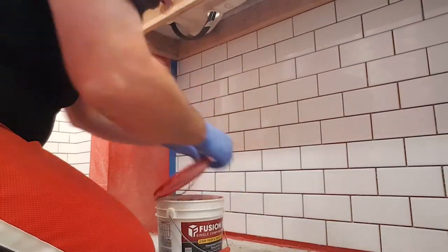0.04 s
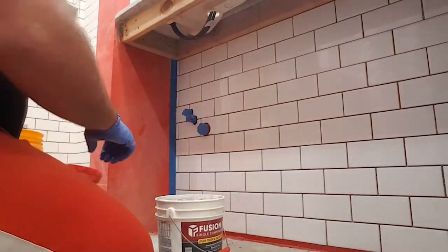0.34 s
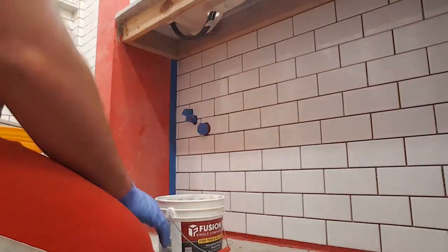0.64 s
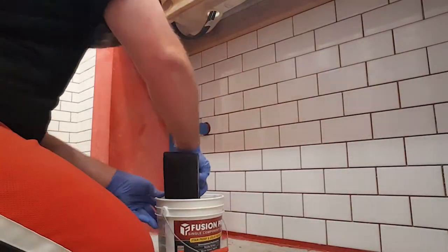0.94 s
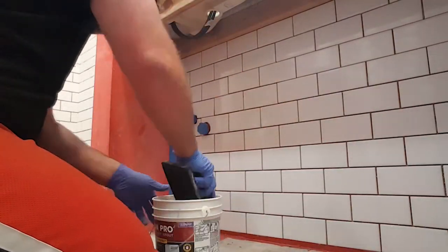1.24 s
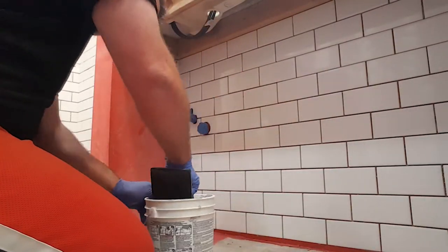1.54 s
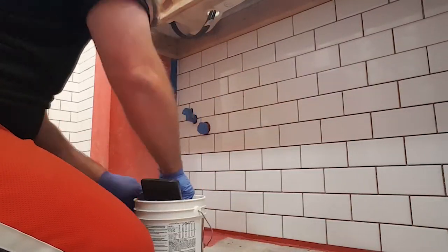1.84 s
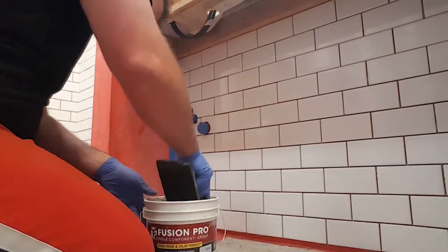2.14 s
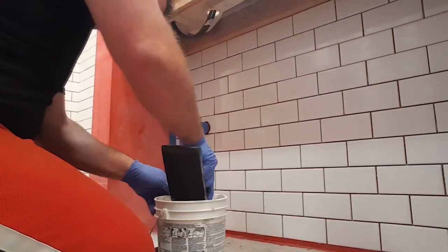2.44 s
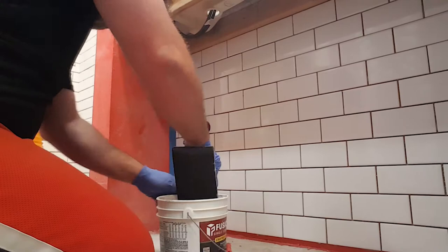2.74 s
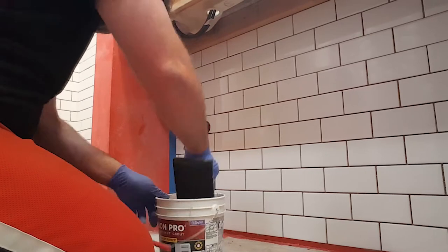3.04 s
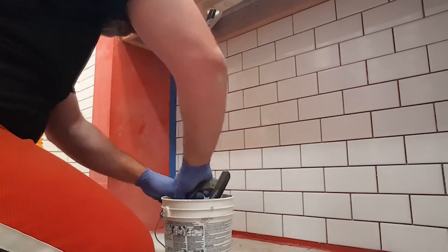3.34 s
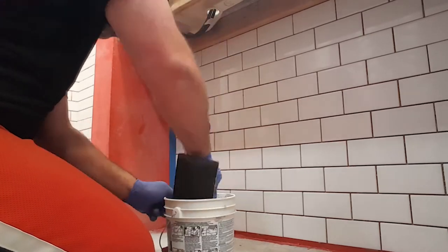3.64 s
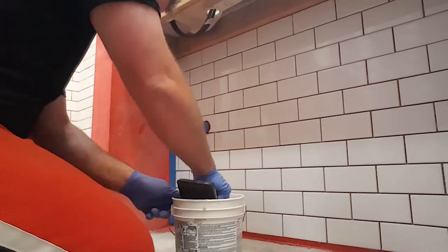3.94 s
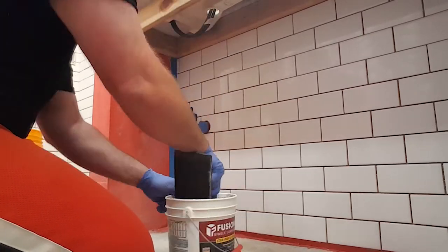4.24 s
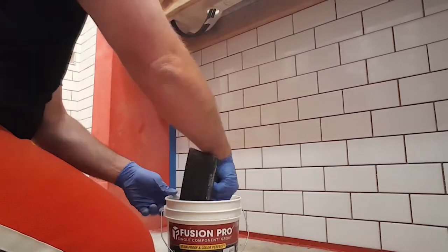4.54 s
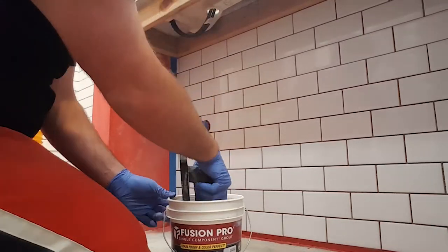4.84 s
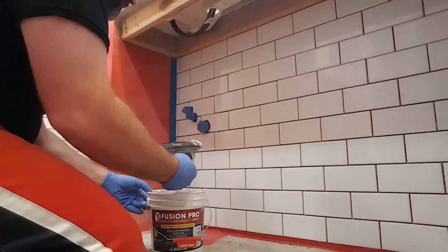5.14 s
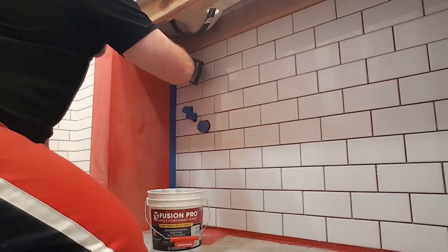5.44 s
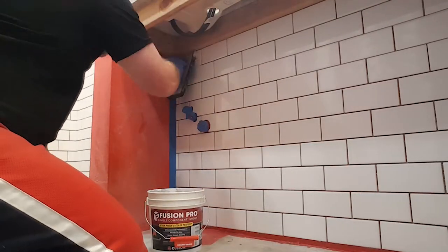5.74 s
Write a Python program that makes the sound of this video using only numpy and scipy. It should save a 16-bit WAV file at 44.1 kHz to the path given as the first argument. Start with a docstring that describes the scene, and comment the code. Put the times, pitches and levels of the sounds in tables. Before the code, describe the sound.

A plastic lid clacks down, then a rubber float scrapes, knocks and squelches through thick, sandy grout in a pail and snaps off the rim.

```python
"""A small tiled room, a stereo pair of microphones close to a plastic pail; a faint hum throughout.
A gloved hand carries off the lid and drops it with a clack. From about one second a rubber float works
thick, sandy grout in quick, uneven strokes, nine or ten a second: grains scrape, the float knocks on
the pail, and the paste smacks and plops. Near five seconds the float tears free, rasps over the ringing
rim and snaps off it. Last, it starts to wipe the tiles, with two soft bumps."""
import sys
import numpy as np
from scipy import signal
from scipy.fft import rfft, irfft
from scipy.io import wavfile

SR = 44100
rng = np.random.default_rng(int(sys.argv[2]) if len(sys.argv) > 2 else 0)


def wav_out(sig):
    """Save sig, one row per channel (or a flat mono array), as 16-bit PCM at SR to the path in sys.argv[1]."""
    wavfile.write(sys.argv[1], SR, np.round(np.clip(np.atleast_2d(sig).T, -1, 1) * 32767).astype(np.int16))


N = 259300
TAPS = 8192
HZ = np.fft.rfftfreq(TAPS, 1 / SR)

# float pushed through the grout, a gap resonating at its blade:
# start_s, length_s, relative_db, treble_db, gap_hz
FLOAT_STROKES = [(0.969, 0.035, -43, 3, 1150), (1.08, 0.061, -41, 1.5, 990),
                 (1.19, 0.081, -46.5, 9.5, 1000), (1.285, 0.079, -48.5, 6, 700),
                 (1.394, .055, -40, 0, 3470), (1.549, 0.034, -44, -0.5, 1790),
                 (1.608, 0.024, -41.5, 2, 3530), (1.67, 0.064, -50, 2, 3600),
                 (1.765, 0.046, -37.5, -1, 2150), (1.83, 0.069, -56, -4, 310), (1.924, 0.069, -35, -1, 655),
                 (2.101, 0.043, -38.5, 3, 1210), (2.15, 0.076, -46, -13, 1220),
                 (2.254, 0.062, -39.5, 3, 1780), (2.366, 0.019, -45, 0.5, 1680),
                 (2.442, 0.041, -38.5, 0.5, 1920), (2.558, 0.072, -38, -3, 1390),
                 (2.635, 0.097, -50.5, 7, 1740), (2.728, 0.038, -36, -2.5, 3480),
                 (2.818, 0.029, -39.5, -24, 603), (2.863, 0.12, -38.5, -1.5, 1100),
                 (2.99, 0.074, -45.5, 1, 3520), (3.123, 0.084, -41.5, 2, 1740),
                 (3.255, 0.056, -49.5, 1.5, 1080), (3.317, 0.018, -41.5, -4, 1110),
                 (3.497, 0.021, -56, 5.5, 2740), (3.613, 0.031, -42, -0.5, 2730),
                 (3.735, 0.016, -44.5, 1.5, 780), (3.872, 0.12, -43.5, -0.5, 4100),
                 (3.995, 0.076, -43, 2.5, 1760), (4.134, 0.033, -38, 0, 1770),
                 (4.26, 0.035, -40.5, 1, 2020), (4.376, 0.065, -42, 0.5, 655),
                 (4.525, .019, -41, -4.5, 1920), (4.597, 0.022, -45, -0.5, 1850)]
# float tearing free of the paste: start_s, length_s, level_db, treble_db, gap_hz
FLOAT_PULL = [(4.772, 0.051, -31.5, 9.6, 2330)]
# float against the pail: start_s, strength_db, bass_db, gap_hz
FLOAT_KNOCKS = [(1.1211, -13.5, -9, 1170), (1.24, -5.5, -3, 1010), (1.334, -14, 9, 700),
                (1.9864, -8.5, 10, 1540), (2.1513, -0.5, -8, 2740), (2.1539, -5, 0, 1300),
                (2.3139, -12, 10, 890), (2.491, -1.5, -2, 1790), (2.4942, -1, -8, 1450),
                (2.5804, -9.5, 3, 1320), (2.638, -3, 3, 1740), (2.6462, -21, -17, 1690),
                (2.6875, -11.5, 5.5, 1070), (2.8041, -15.5, 10, 1790), (2.8699, -7, -2, 1100),
                (2.9304, -3.5, -0.5, 1300), (2.9339, -2, 3, 900), (3.0129, -3, 6, 3520),
                (3.106, -12.5, 8.5, 650), (3.151, -10.5, 5, 1140), (3.911, -6, -5, 1900),
                (3.944, -15, 7, 2150), (4.029, -8, -11, 1790), (4.3917, -9.5, 4, 1850),
                (4.4292, -10.5, 8.5, 660), (4.9609, -10.5, 1, 1540)]
# air pockets popping in the paste: start_s, strength_db, pitch_hz
AIR_POCKETS = [(1.02, -24.5, 724), (1.4549, -19, 507), (1.578, -25, 416), (1.6661, -17, 524),
               (1.8075, -20.5, 900), (1.8403, -19.5, 310), (1.8725, -23.5, 368), (1.945, -17.5, 596),
               (2.0056, -23.5, 310), (2.0384, -18, 570), (2.1981, -22.5, 695), (2.335, -20, 300),
               (2.5572, -17.5, 640), (2.6623, -27, 370), (2.7783, -21, 477), (2.8367, -26, 290),
               (2.8616, -14.5, 580), (2.9744, -19.5, 800), (3.4984, -34.5, 603), (3.748, -25, 290),
               (3.8467, -20, 780), (4.1, -24, 394), (4.925, -17, 472), (4.948, -19, 364)]
# sticky grout letting go: start_s, strength_db
GROUT_SMACKS = [(1.1919, -21.5), (1.1997, -17), (1.2858, -21), (1.3262, -21), (1.337, -18), (1.6744, -23),
                (1.707, -23), (1.8394, -21.5), (2.0058, -23.5), (2.198, -32), (2.341, -28), (2.6607, -19),
                (2.8041, -28), (2.8347, -21.5), (3.011, -18), (3.0841, -14), (3.1318, -18), (3.1959, -15),
                (4.0297, -31), (4.1, -29), (4.5037, -35), (5.101, -32)]
# paste dragging on the float: time_s, level_db
PASTE_DRAG = [(0.95, -63), (1.01, -52.5), (1.3, -55), (1.51, -58.5), (1.85, -53), (2.42, -62.5),
              (2.6, -50.5), (3.17, -55.5), (3.34, -56.5), (3.45, -79), (3.56, -68.5), (3.8, -56.5),
              (3.95, -52), (4.22, -59), (4.58, -58.5), (4.75, -73.5)]
# float drawn over the rim and lifted away: time_s, rasp_db, ring_hz, ring_drive_db
RIM_PATH = [(4.84, -58, 1450, -52), (4.87, -39.5, 1480, -42), (4.895, -36, 1520, -50),
            (4.93, -46, 1650, -27), (5.015, -45, 1580, -33), (5.05, -40, 1540, -41),
            (5.08, -53.5, 1610, -36.5), (5.135, -52.5, 1760, -24.5), (5.165, -54.5, 1720, -67),
            (5.25, -62.5, 1800, -60.5), (5.351, -70.5, 1790, -76)]
# float snapping off the rim: start_s, strength_db
RIM_SNAPS = [(5.169, -2.5), (5.1715, 1)]
# gloves and lid rustling, later the float wiping tiles: start_s, length_s, level_db, treble_db, gap_hz
RUSTLES_AND_WIPES = [(0.0, 0.083, -50, -8.5, 400), (0.07, 0.09, -54.5, 2.5, 1190),
                     (0.16, 0.11, -62, -6, 830), (0.6, 0.056, -60.5, -2, 1790),
                     (0.7, 0.16, -64, -0.5, 1230), (0.9, .06, -61.5, -1, 560), (5.465, 0.024, -77, 7, 4970),
                     (5.53, 0.056, -69, 6, 874), (5.585, 0.044, -60.5, -1.5, 1540),
                     (5.68, 0.081, -66.5, -4, 290), (5.8, 0.1, -63.5, -1.5, 2560)]
# light touches on lid and float: start_s, strength_db, treble_db, gap_hz
LIGHT_TOUCHES = [(0.0373, -25, -12, 1200), (0.0519, -18, -15, 1230), (0.0818, -26.5, 9, 2260),
                 (0.1504, -34.5, 14, 790), (0.2174, -32, 7.5, 2930), (0.6012, -27.5, -6, 2970),
                 (0.7453, -42.5, 17.5, 2520), (0.8132, -24.5, -2, 710), (0.9049, -22, -11, 544),
                 (5.7175, -42, 16.5, 1760)]
# lid landing and settling: start_s, strength_db, bass_db, treble_db
LID_LANDINGS = [(0.6424, -4, -3, 3), (0.6457, -4.5, -3.5, -1), (0.6582, -28, 1, -23), (0.6642, -8, 3, -1)]
# float bumping the tiled wall: start_s, level_db, pitch_hz, decay_s
WALL_BUMPS = [(5.708, -67, 326, .012), (5.742, -59, 255, 0.0065)]

# broad colour of pail, lid and handling: frequency_hz, relative_db
PAIL_SPECTRUM = [(60, -30.5), (130, -30), (250, -14.5), (600, -6.5), (1200, -8), (2000, 3), (2800, -2.5),
                 (5000, -0.5), (10000, -5), (13500, -6.5), (15800, -14)]
LID_SPECTRUM = [(60, -26), (130, -29), (250, -12.5), (1200, -3.5), (2000, -4), (2900, -3.5), (5000, 0.5),
                (10000, -4.5), (15800, -5.5)]
HAND_SPECTRUM = [(60, -44), (130, -34), (300, -5), (800, 3), (1300, -1.8), (1800, -1.5), (4000, -3),
                 (9000, -4.5), (15800, -11.5)]
# resonances of pail, lid and free rim: pitch_hz, width_hz, lift_db
PAIL_RESONANCES = [(248.4, 6.4, 4), (295, 69, -1.5), (408, 42, 6.5), (580, 38, 8.5), (658, 40, 9),
                   (710, 120, 6.5), (789, 42, 13), (900, 16, 15), (1078, 74, 14.5), (1124.6, 20, 21.5),
                   (1281, 16, 16), (1350, 26, 8.5), (1502, 95, 9), (1480, 91, -2.5), (1679, 28, 13),
                   (1740, 23, 11), (1788.4, 26, 14), (2200, 6.8, 4.5), (2150, 65, -1), (2730, 190, 2.5),
                   (3510, 108, 8), (3735, 78, 1.5), (3950, 76, 9), (4710, 32, -5), (5160, 15, -0.5)]
LID_RESONANCES = [(786, 37, 21.8), (1580, 140, 10.6), (1740, 66, 12.3), (2130, 74, 21.3), (2280, 55, 17),
                  (2250, 47, 18)]
RIM_RESONANCES = [(660, 59, 17), (786, 70, 16.5), (1127, 55, 20), (1480, 100, 12.5), (1627, 105, 12.5),
                  (1766, 31, 11.5), (2140, 50, 3), (2770, 76, 12.5), (5250, 210, -3)]

# decay of the room's tail: frequency_hz, t60_s
TAIL_DECAY = [(200, 0.47), (700, 0.15), (2000, 0.12), (6000, 0.14), (15000, 0.074)]
# tail against direct sound: frequency_hz, level_db
TAIL_LEVEL = [(200, -4.5), (900, -8.5), (1800, 1.5), (3500, 0.5), (14000, 7)]
# likeness of diffuse sound at the two microphones: frequency_hz, coherence (0-1)
MIC_COHERENCE = [(100, 0.98), (700, 0.95), (1400, 0.74), (2500, 0.22), (14000, 0.04)]
# direct sound reaching the left microphone first: frequency_hz, lead_rad
LEFT_MIC_LEAD = [(100, 0), (1200, 0.17), (2100, 0.7), (3200, 1.75), (4200, 4), (6000, 5), (8500, 8.5),
                 (12000, 5.5), (15000, 10.5)]
# balance of the microphones: frequency_hz, left_minus_right_db
MIC_BALANCE = [(60, 1), (110, 7), (200, -0.5), (380, 3.5), (700, 0), (1290, 3.0), (2380, 5.5), (4400, 4.5),
               (8120, 2.5), (15000, 6)]
# colour of the still room air: frequency_hz, relative_db
AIR_SPECTRUM = [(20, 4), (60, -27), (120, -23), (170, -13.5), (230, 1), (370, -9.5), (480, -8),
                (780, -11.5), (1200, -12.5), (2000, -18.5), (11500, -21), (16000, -30)]
# faint hum: pitch_hz, level_db
HUM_TONES = [(468.3, -78.5), (651.4, -90), (1254, -94.5), (2121, -97)]


def grout():
    """The float works the paste; everything sounds through the pail and the air in it."""
    pail = body(PAIL_SPECTRUM, PAIL_RESONANCES)
    float_sounds = scraping(pail) + tearing(pail) + knocking(pail)
    return float_sounds + plopping(pail) + smacking(pail) + cracking_sand(pail) + squelching(pail)


def scraping(pail):
    """Sand catches and slips under the blade, each stroke easing off as it goes."""
    return amp(-0.55) * strokes(FLOAT_STROKES, pail, bass_db=-2.5, gap_db=6, swell_db=-5, arch=0.33,
                                grains_per_s=2200, grain_db=3.5, hiss=0.42, judder_db=4, judder_per_s=219.5)


def tearing(pail):
    """The float pulls free of the paste in one bright, swelling rip."""
    return strokes(FLOAT_PULL, pail, bass_db=-7, gap_db=6.5, swell_db=11.5, arch=1.04,
                   grains_per_s=7900, grain_db=0.2, hiss=1, judder_db=4, judder_per_s=370)


def knocking(pail, treble_db=-7.5, gap_db=6.5):
    """Rubber knocks dully on the pail's wall."""
    rows = [(s, db, bass_db, treble_db, gap_hz, gap_db) for s, db, bass_db, gap_hz in FLOAT_KNOCKS]
    return blows(rows, pail, crunch=0.16, crunch_s=0.0041)


def plopping(pail, bass_db=12.5, treble_db=-4.5, gap_db=8.5):
    """Pockets of air pop in the paste, each with its own low pitch."""
    rows = [(s, db, bass_db, treble_db, pitch_hz, gap_db) for s, db, pitch_hz in AIR_POCKETS]
    return blows(rows, pail, crunch=0.46, crunch_s=0.0088)


def smacking(pail, bass_db=2.6, treble_db=15.4, gap_hz=110, gap_db=11):
    """Sticky grout lets go with a bright, wet smack."""
    rows = [(s, db, bass_db, treble_db, gap_hz, gap_db) for s, db in GROUT_SMACKS]
    return blows(rows, pail, crunch=0.83, crunch_s=0.0033)


def cracking_sand(pail, lowest_hz=2800):
    """Now and then a single large grain cracks under the moving float."""
    ticks = strokes(FLOAT_STROKES, pail, bass_db=-3, gap_db=-2, swell_db=-4, arch=0.47,
                    grains_per_s=140, grain_db=7, hiss=0.05, judder_db=4, judder_per_s=100)
    return amp(-5.5) * signal.sosfilt(signal.butter(2, lowest_hz, "high", fs=SR, output="sos"), ticks)


def squelching(pail):
    """Heavy paste drags around the float for as long as it moves in the pail."""
    drag = friction(N, grains_per_s=500, grain_db=3, hiss=0.4, judder_db=3.5, judder_per_s=55)
    response = contact_response(pail, bass_db=6.5, treble_db=2.5, gap_hz=300, gap_db=15.5)
    return signal.fftconvolve(drag * envelope(PASTE_DRAG), response)[:N]


def rim_scrape(width_hz=170):
    """The float rasps over the rim, which rings higher and clearer as the paste is wiped off."""
    rim = body(PAIL_SPECTRUM, RIM_RESONANCES)
    time_s, _, ring_hz, ring_drive_db = np.transpose(RIM_PATH)
    rubbing = friction(N, grains_per_s=3600, grain_db=2, hiss=0.2, judder_db=3, judder_per_s=150)
    response = contact_response(rim, bass_db=-1, treble_db=2.5, gap_hz=1250, gap_db=4.5)
    rasp = signal.fftconvolve(rubbing * envelope(RIM_PATH), response)[:N]
    pitch_hz = np.interp(np.arange(N) / SR, time_s, ring_hz)
    ring_drive = rubbing * envelope(np.c_[time_s, ring_drive_db])
    return rasp + resonate(resonate(ring_drive, pitch_hz, width_hz), pitch_hz, 2 * width_hz)


def rim_snap(bass_db=1, treble_db=-10, gap_hz=3400, gap_db=8):
    """The bare rim cracks as the float snaps off it."""
    rows = [(s, db, bass_db, treble_db, gap_hz, gap_db) for s, db in RIM_SNAPS]
    return blows(rows, body(PAIL_SPECTRUM, RIM_RESONANCES), crunch=0.94, crunch_s=0.0019)


def lid_clack(gap_hz=1900, gap_db=1.5):
    """The plastic lid lands and settles; the air under it resonates alike each time."""
    rows = [(*landing, gap_hz, gap_db) for landing in LID_LANDINGS]
    return blows(rows, body(LID_SPECTRUM, LID_RESONANCES), crunch=1, crunch_s=0.006)


def handling(touch_bass_db=0.5, touch_gap_db=15):
    """Soft friction and light touches: gloves on the lid, later the float on the tiles."""
    hand = body(HAND_SPECTRUM)
    rustle = strokes(RUSTLES_AND_WIPES, hand, bass_db=0.6, gap_db=6, swell_db=-3.5, arch=0.19,
                     grains_per_s=970, grain_db=-3, hiss=0.99, judder_db=3, judder_per_s=145)
    rows = [(s, db, touch_bass_db, treble_db, hz, touch_gap_db) for s, db, treble_db, hz in LIGHT_TOUCHES]
    return rustle + blows(rows, hand, crunch=1.7, crunch_s=0.0048)


def wall_bumps():
    """The loaded float meets the wall, which answers with a short low note."""
    out, t = np.zeros(N), np.arange(TAPS) / SR
    for start_s, level_db, pitch_hz, decay_s in WALL_BUMPS:
        swell = t / decay_s * np.exp(1 - t / decay_s)
        add(out, start_s, amp(level_db) * swell * np.sin(2 * np.pi * pitch_hz * t))
    return out


def strokes(rows, body_gain, bass_db, gap_db, swell_db, arch, **texture):
    """Each stroke is friction under one arch of pressure, leaning by swell_db from start to end."""
    out = np.zeros(N)
    for start_s, length_s, level_db, treble_db, gap_hz in rows:
        count = max(int(length_s * SR), 16)
        progress = (np.arange(count) + 0.5) / count
        pressure = np.sin(np.pi * progress) ** arch * amp(level_db + swell_db * (progress - 0.5))
        response = contact_response(body_gain, bass_db, treble_db, gap_hz, gap_db)
        add(out, start_s, signal.fftconvolve(friction(count, **texture) * pressure, response))
    return out


def friction(count, grains_per_s, grain_db, hiss, judder_db, judder_per_s):
    """Grains of uneven size catch and slip under a juddering pressure; rms 1."""
    drawn = max(count, SR // 4)
    chance, size = rng.random((2, drawn))[:, :count]
    sign, fine_noise = rng.standard_normal((2, drawn))[:, :count]
    catches = chance < grains_per_s / SR
    grains = catches * np.sign(sign) * amp(grain_db * np.minimum(-np.log(size), 4))
    judder = amp(judder_db * wander(count, judder_per_s))
    return unit_rms((unit_rms(grains) + hiss * fine_noise) * judder)


def blows(rows, body_gain, crunch, crunch_s):
    """Each blow is one sharp push and a brief crunch of grit, ringing the body."""
    out, t = np.zeros(N), np.arange(TAPS // 8) / SR
    for start_s, strength_db, *contact in rows:
        grit = rng.standard_normal(len(t)) * np.exp(-t / crunch_s)
        push = (t == 0) + crunch * grit / np.linalg.norm(grit)
        ringing = signal.fftconvolve(push / np.linalg.norm(push), contact_response(body_gain, *contact))
        add(out, start_s, amp(strength_db) * ringing)
    return out


def body(colour, modes=()):
    """Gain by frequency of an object: broad colour times resonance peaks; rms 1."""
    peaks = sum(amp(db) ** 2 / (1 + (2 * (HZ - hz) / width) ** 2) for hz, width, db in modes)
    return unit_rms(amp(curve(colour, HZ)) * np.sqrt(1 + peaks))


def contact_response(body_gain, bass_db, treble_db, gap_hz, gap_db, bass_hz=900, treble_hz=3100, gap_q=5):
    """A body's answer to one contact: weight adds bass, grit treble, and the gap a resonance."""
    tint_db = bass_db / (1 + (HZ / bass_hz) ** 6) + treble_db / (1 + (treble_hz / (HZ + 1)) ** 6)
    undamped = np.clip(gap_hz / 900, 0.4, 1)  # the paste damps low resonances to a share of gap_db
    tint_db += undamped * gap_db / (1 + (2 * gap_q * (HZ / gap_hz - 1)) ** 2)
    log_gain = np.log(np.maximum(body_gain * amp(tint_db), 1e-5))
    mirrored = np.r_[log_gain, log_gain[-2:0:-1]]
    minimum_phase = np.exp(np.conj(signal.hilbert(mirrored)))  # nothing rings before the contact
    return irfft(minimum_phase[:len(HZ)])[:TAPS // 2]


def resonate(x, pitch_hz, width_hz):
    """A resonance of gain 1 that glides along pitch_hz."""
    turn = np.exp(2j * np.pi * np.cumsum(pitch_hz) / SR)
    pole = np.exp(-np.pi * width_hz / SR)
    return 2 * (turn * signal.lfilter([1 - pole], [1, -pole], x / turn + 1e-18)).real


def tiled_room(x, size=TAPS // 2):
    """Tiled walls answer quickly; the echo pattern shifts at random, as when arm and float move."""
    padded, out = np.pad(x, size), np.zeros((N + 2 * size, 2))
    margin = TAPS // 128  # holds the response's early ripple
    for at in range(0, N + size, size // 2):
        piece = padded[at:at + size] * signal.windows.cosine(size)
        responses = np.roll(irfft(microphone_paths()), margin, axis=1)
        at_mics = signal.fftconvolve(piece[None], responses, axes=1)[:, margin:]
        add(out, at / SR, at_mics.T)
    return out[size:size + N].T


def microphone_paths(spread_s=0.001975):
    """Spectra to both microphones: direct sound, smeared by short bounces in the pail, plus the tail."""
    knots_hz = np.linspace(0, SR / 2, 64)
    delay_s = spread_s * np.interp(HZ, knots_hz, rng.random(len(knots_hz)))
    phase = 2 * np.pi * np.cumsum(delay_s) * HZ[1] + np.outer([0, 1], curve(LEFT_MIC_LEAD, HZ))
    wet = amp(curve(TAIL_LEVEL, HZ))
    balance = amp(np.outer([1, -1], curve(MIC_BALANCE, HZ)) / 2)
    power = np.mean(balance ** 2, 0) * (1 + wet ** 2)
    return balance * (np.exp(-1j * phase) + wet * room_tail()) / np.sqrt(power)


def room_tail():
    """Left and right spectra of one diffuse tail, lingering longest in the bass."""
    hz, t, noise = signal.stft(rng.standard_normal((2, TAPS)), SR, nperseg=256)
    t60_s = curve(TAIL_DECAY, hz)[:, None]
    decaying = diffuse_pair(*noise, hz[:, None]) * amp(-60 * t / t60_s) / np.sqrt(t60_s)
    build_up = np.clip(np.arange(TAPS) / SR / 0.00042 - 0.5, 0, 1)
    tail = signal.istft(decaying, SR, nperseg=256)[1][:, :TAPS] * build_up
    return rfft(tail / np.linalg.norm(tail[0]))


def diffuse_pair(left, independent, hz):
    """Diffuse sound is alike at both microphones in the bass only."""
    coherence = np.clip(curve(MIC_COHERENCE, hz), 0, 1)
    return np.array([left, coherence * left + np.sqrt(1 - coherence ** 2) * independent])


def room_tone(air_db=-74.5):
    """Still room air and a faint, slightly wavering hum."""
    hz, t = np.fft.rfftfreq(N, 1 / SR), np.arange(N) / SR
    noise = rfft(rng.standard_normal((2, N)))
    air = irfft(diffuse_pair(*noise, hz) * amp(curve(AIR_SPECTRUM, hz)), N)
    hum = sum(amp(db + 1.2 * wander(N, 24)) * np.sin(2 * np.pi * pitch_hz * t + 0.28 * wander(N, 4.4))
              for pitch_hz, db in HUM_TONES)
    return amp(air_db) * unit_rms(air) + np.sqrt(2) * hum


def amp(db):
    """Decibels to gain."""
    return 10 ** (np.asarray(db) / 20)


def unit_rms(x):
    """Scales to rms 1."""
    return x / np.sqrt(np.mean(x ** 2) + 1e-20)


def curve(points, hz):
    """Reads rows of frequency_hz, value on a log-frequency axis."""
    frequency_hz, value = np.transpose(points)
    return np.interp(np.log(hz + 1), np.log(frequency_hz + 1), value)


def envelope(points):
    """Gain along rows of time_s, level_db; silent outside them."""
    time_s, level_db = np.transpose(points)[:2]
    return amp(np.interp(np.arange(N) / SR, time_s, level_db, left=-np.inf, right=-np.inf))


def wander(count, per_s):
    """A smooth random curve of spread about 1."""
    knots = rng.standard_normal(N // 16)
    return np.interp(np.arange(count) * per_s / SR, np.arange(len(knots)), knots)


def add(mix, start_s, sound):
    """Mixes a sound in at start_s."""
    part = mix[max(round(start_s * SR), 0):][:len(sound)]
    part += sound[:len(part)]


def scene():
    """The work as it reaches the two microphones, over the room tone."""
    work = grout() + rim_scrape() + rim_snap() + lid_clack() + handling() + wall_bumps()
    return tiled_room(work) + room_tone()


def record(dry):
    """The recorder's band limit cuts the highest treble."""
    edge_hz = 16100
    lowpass = signal.firwin(511, edge_hz, window=("kaiser", 9), fs=SR)
    return signal.oaconvolve(dry, lowpass[None], "same")


dry = scene()
out = record(dry)
wav_out(out)
```